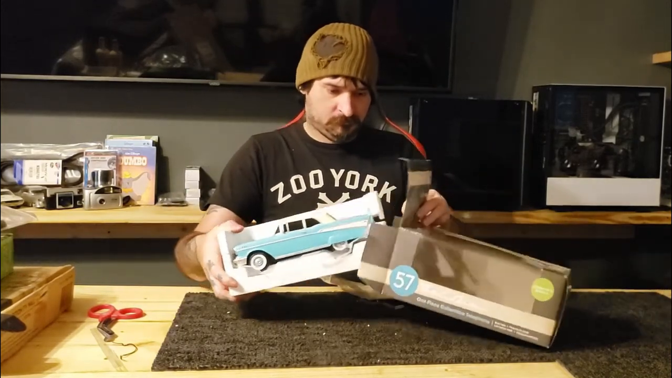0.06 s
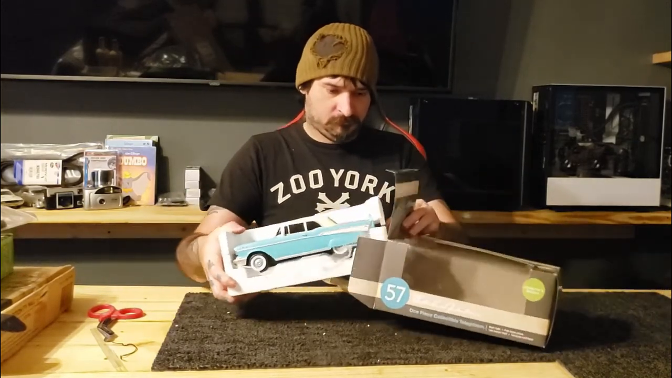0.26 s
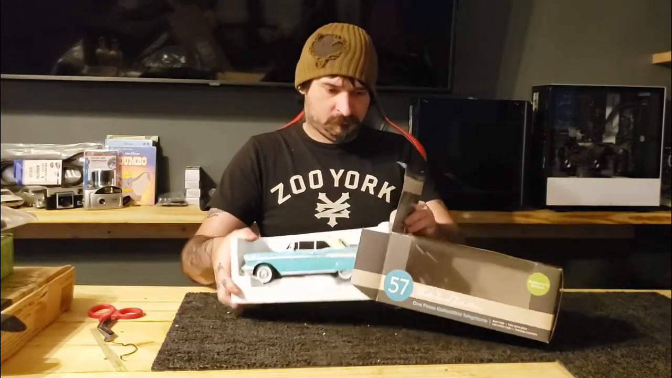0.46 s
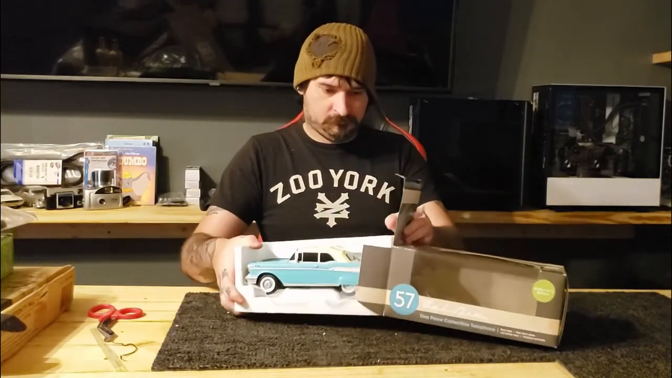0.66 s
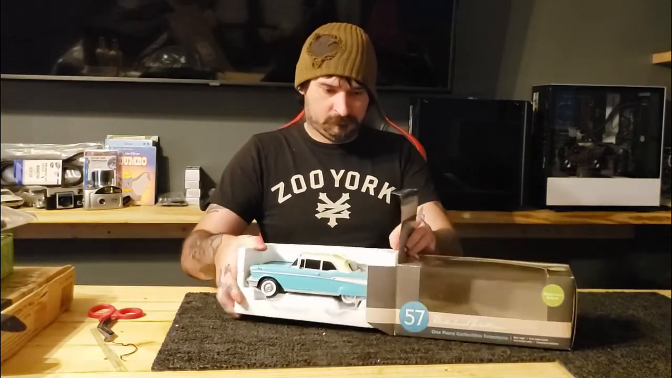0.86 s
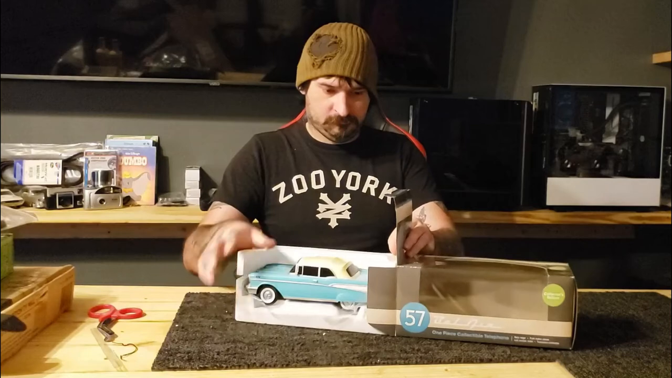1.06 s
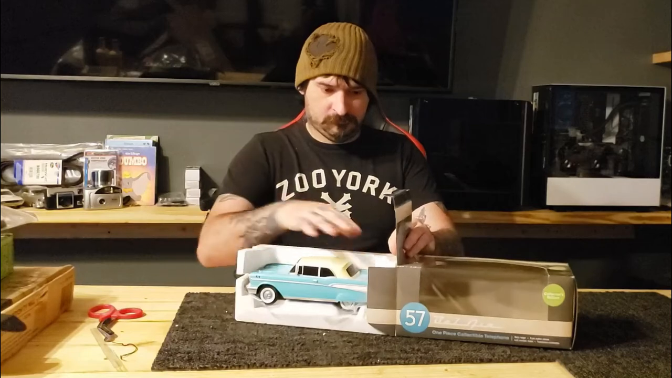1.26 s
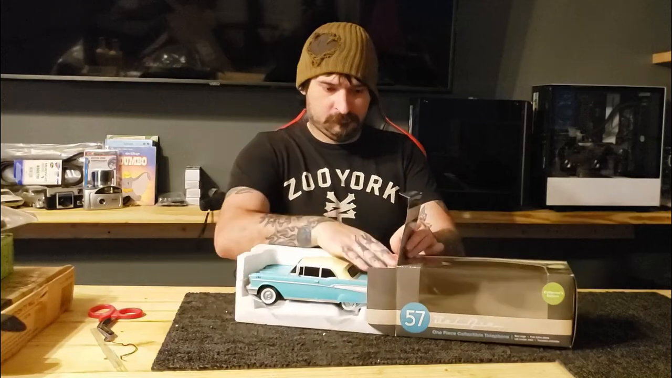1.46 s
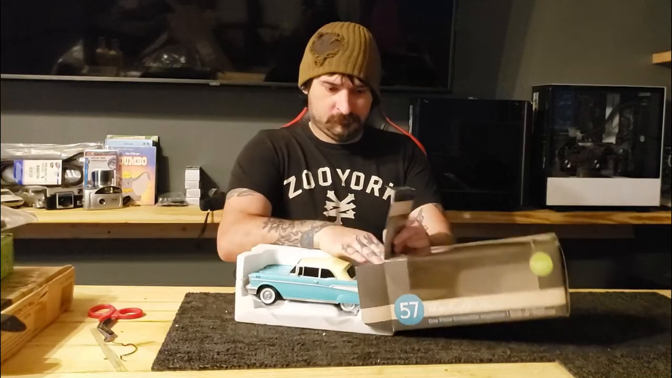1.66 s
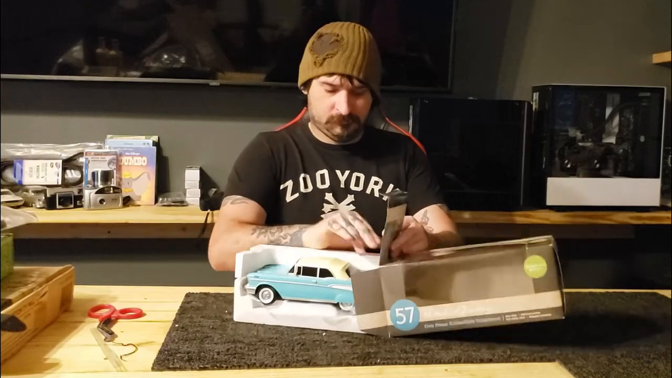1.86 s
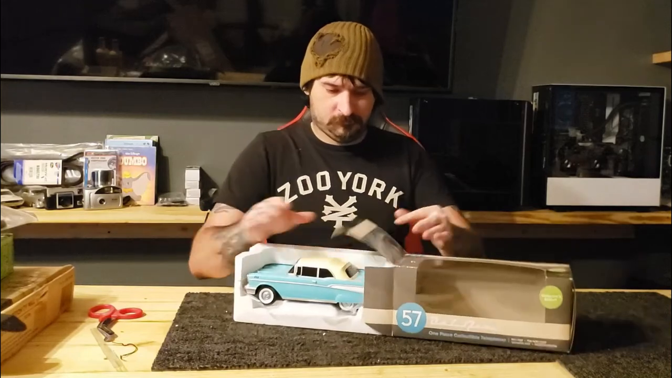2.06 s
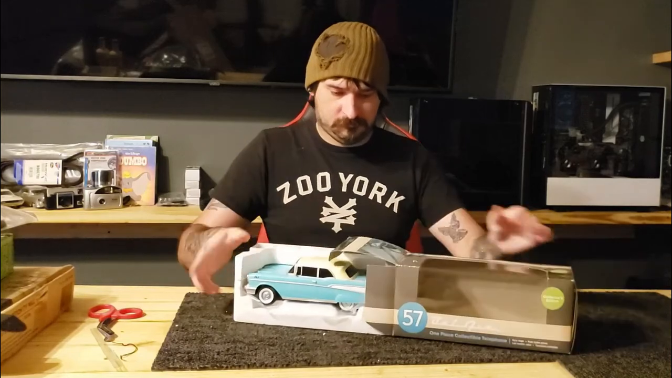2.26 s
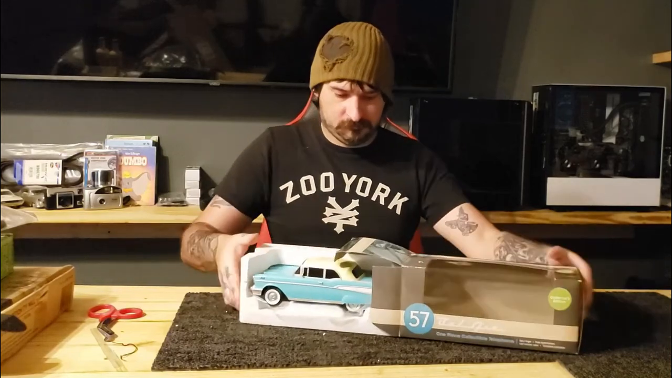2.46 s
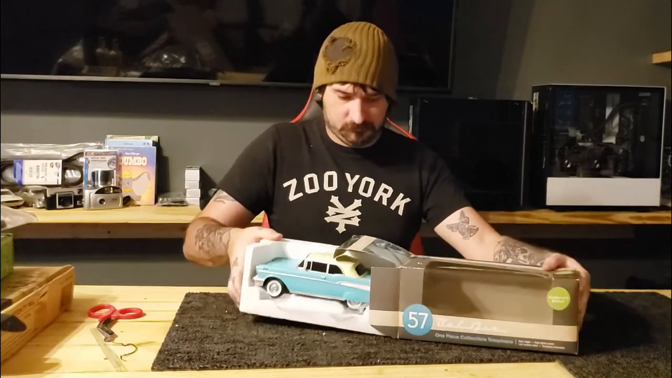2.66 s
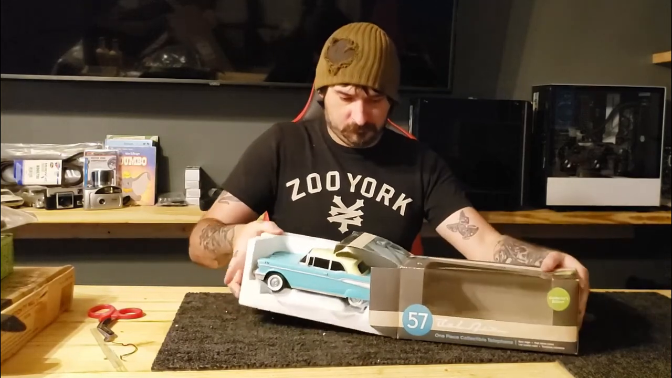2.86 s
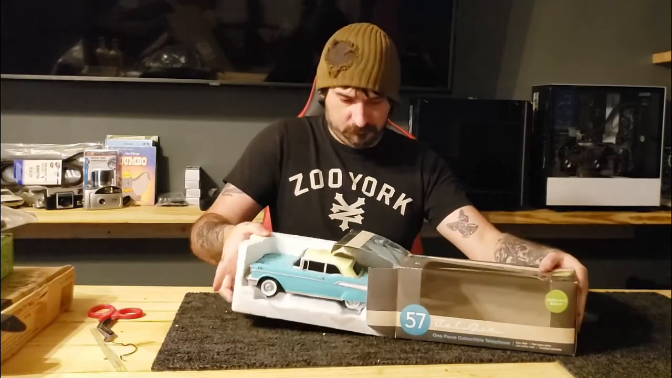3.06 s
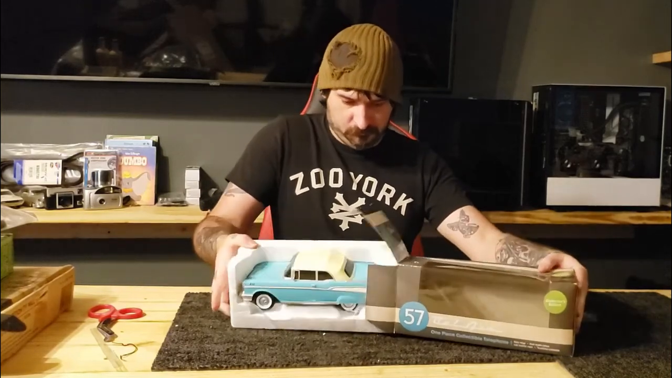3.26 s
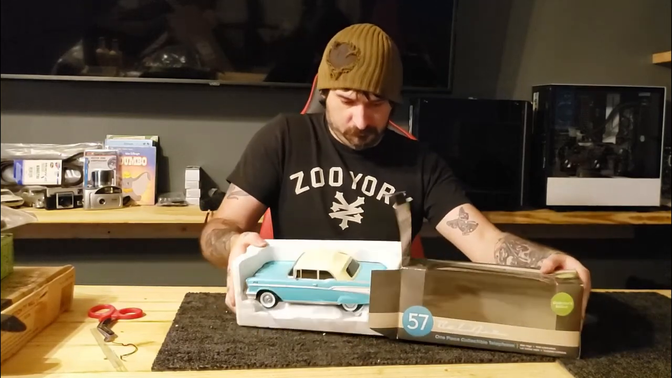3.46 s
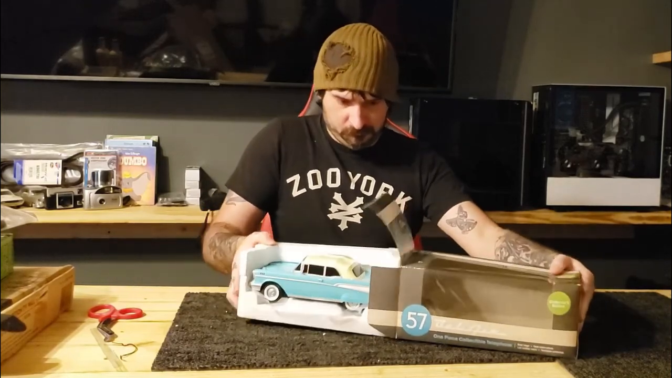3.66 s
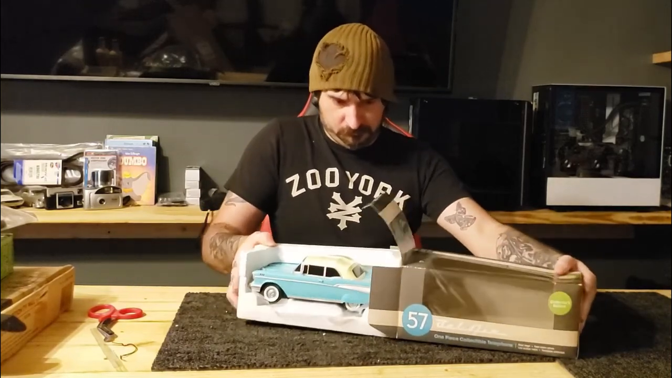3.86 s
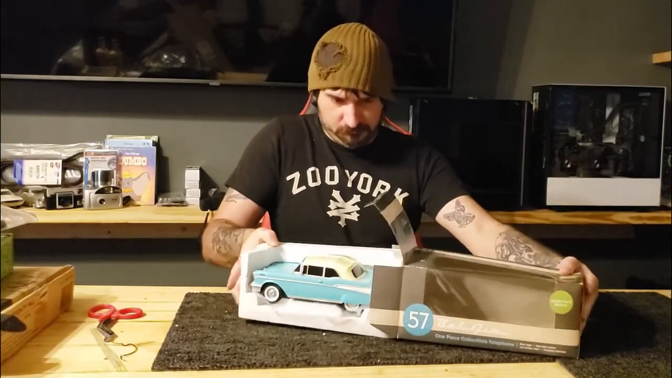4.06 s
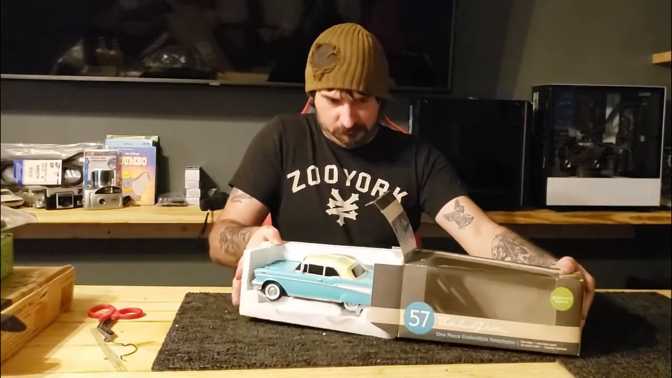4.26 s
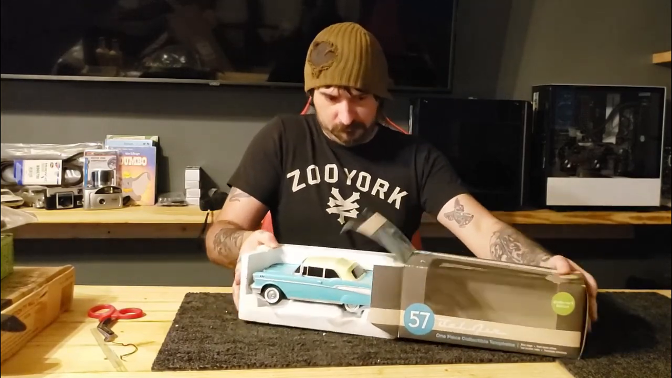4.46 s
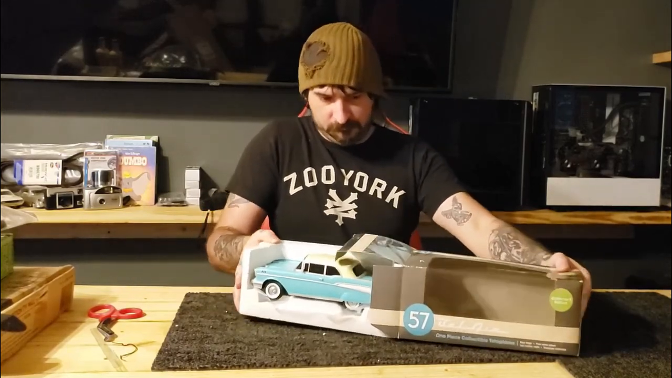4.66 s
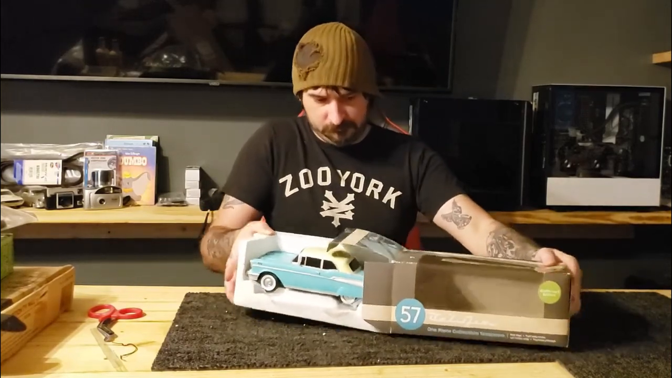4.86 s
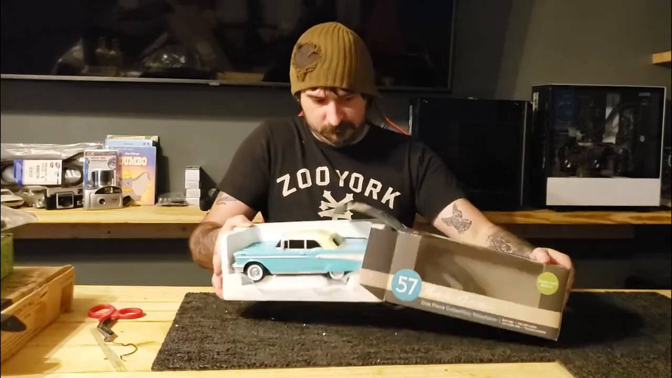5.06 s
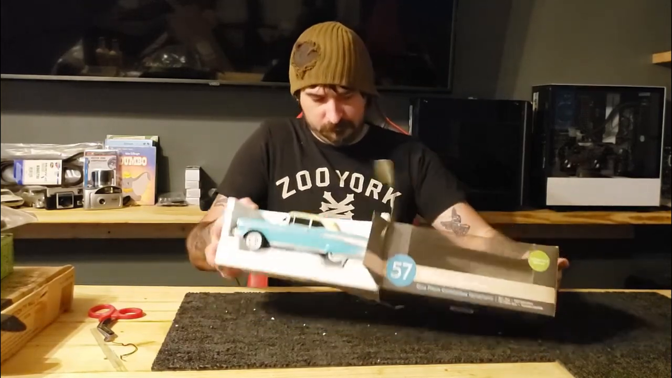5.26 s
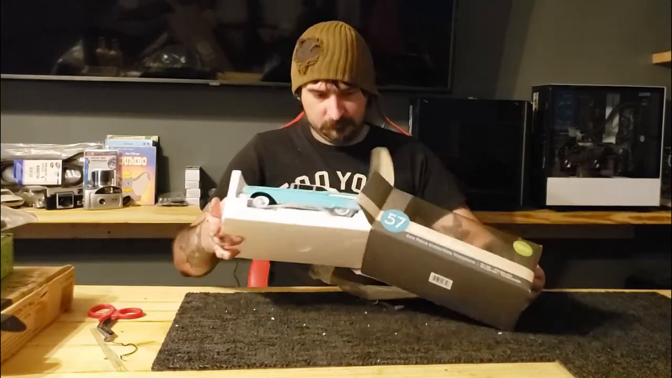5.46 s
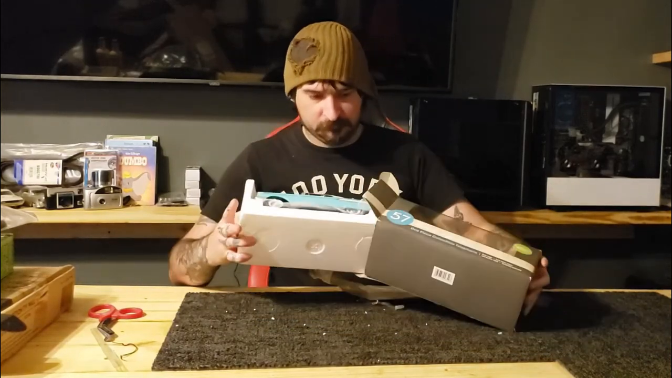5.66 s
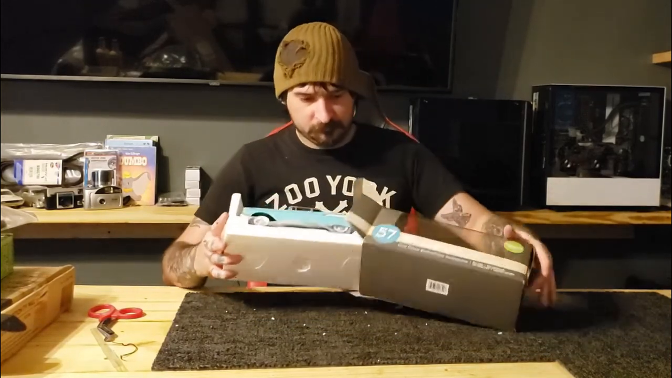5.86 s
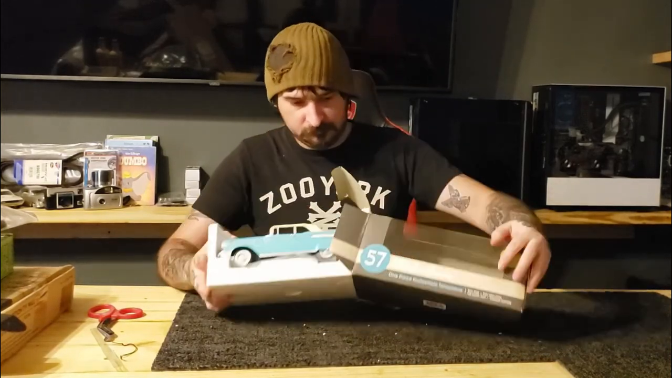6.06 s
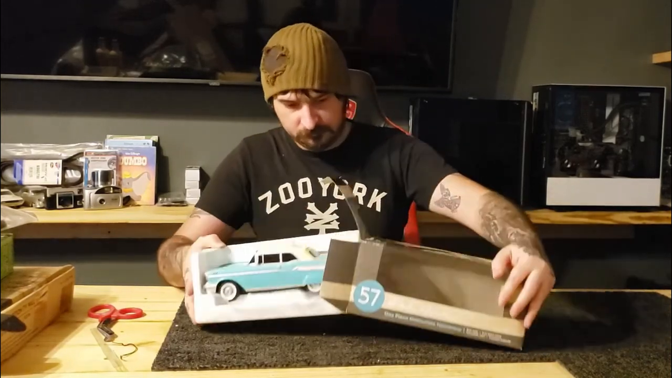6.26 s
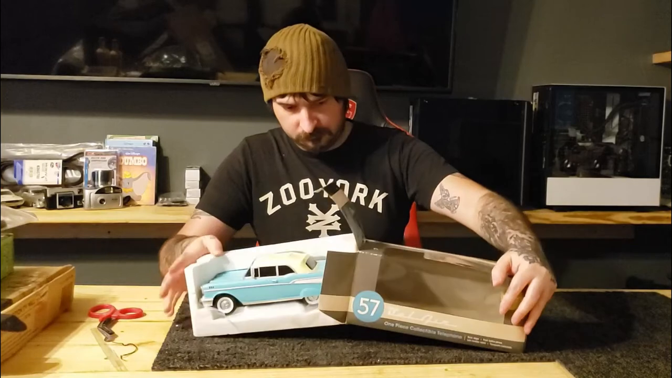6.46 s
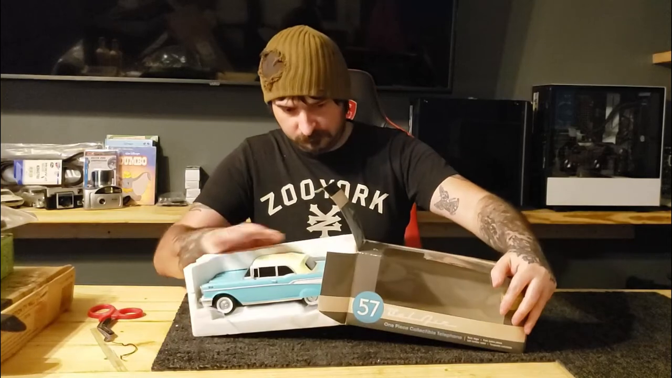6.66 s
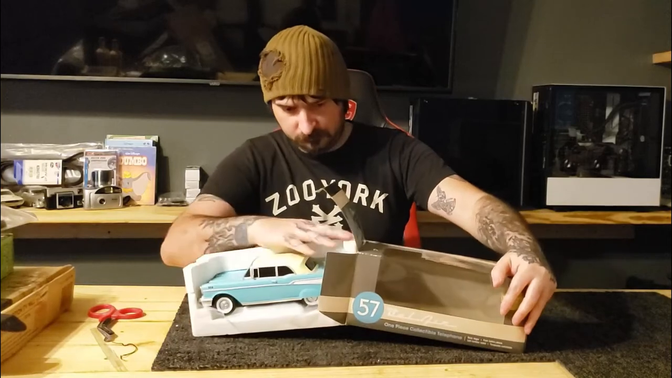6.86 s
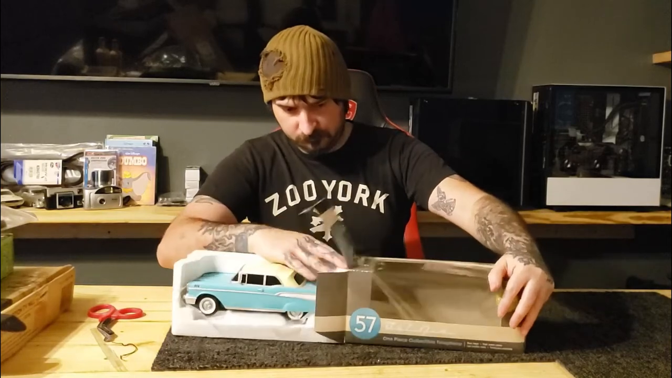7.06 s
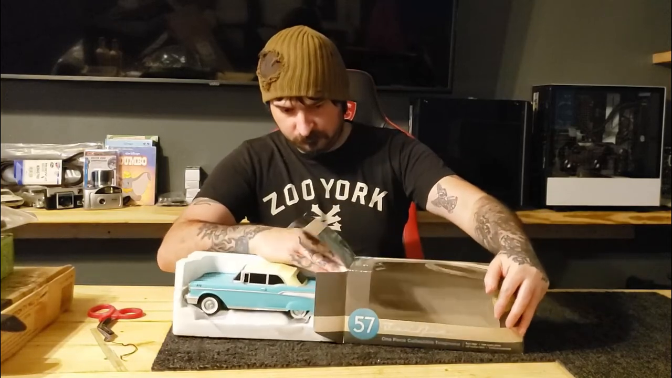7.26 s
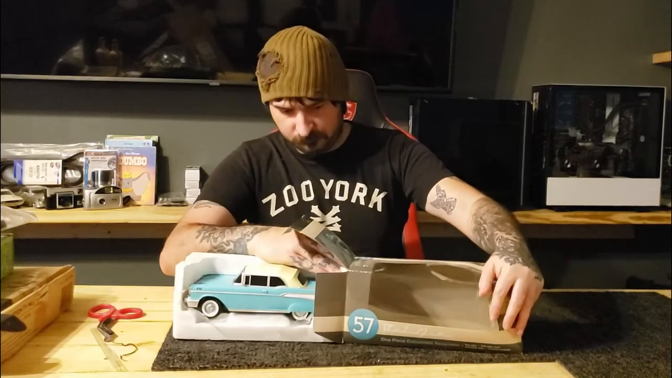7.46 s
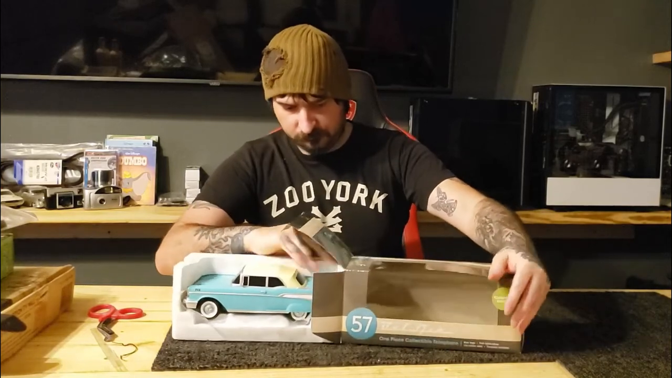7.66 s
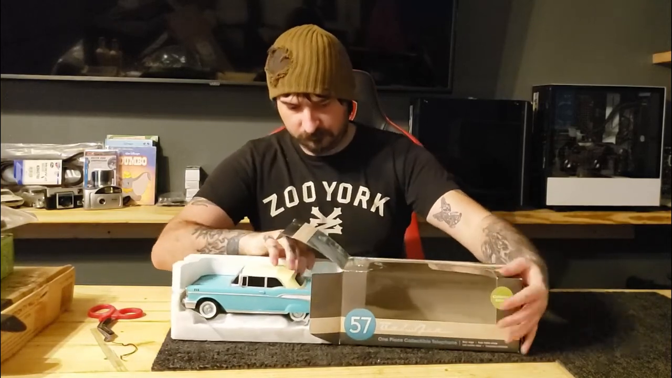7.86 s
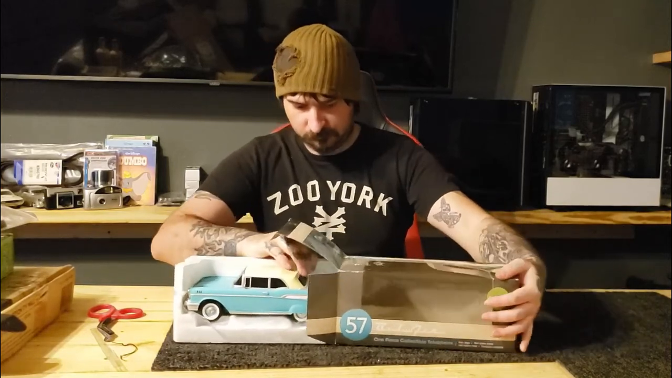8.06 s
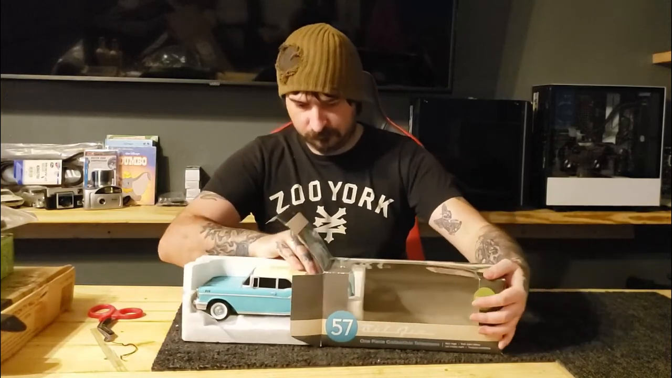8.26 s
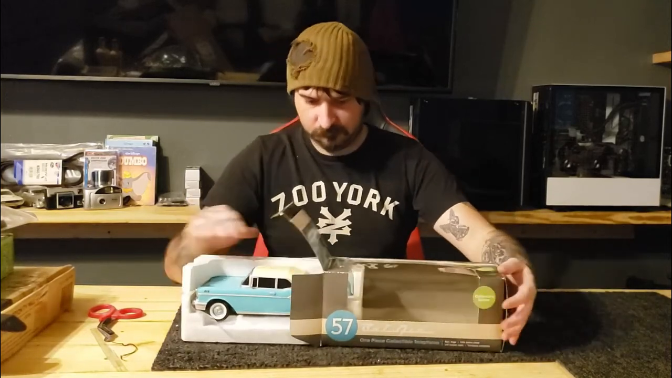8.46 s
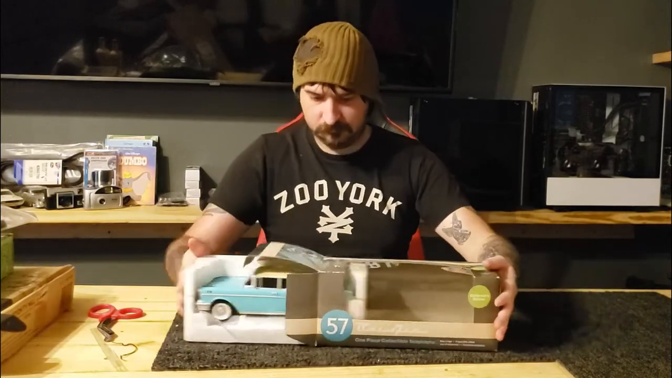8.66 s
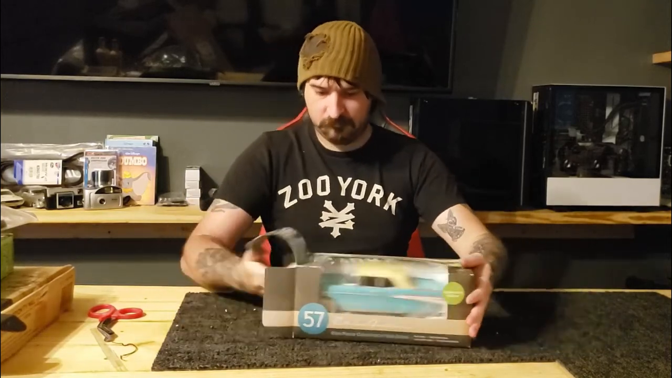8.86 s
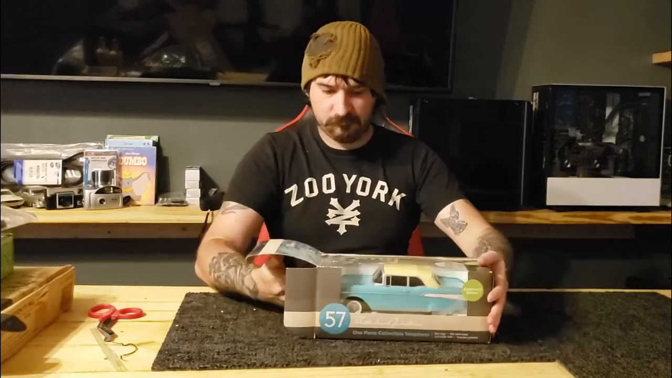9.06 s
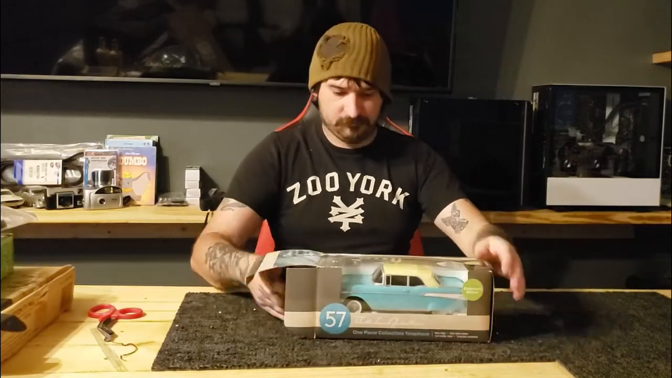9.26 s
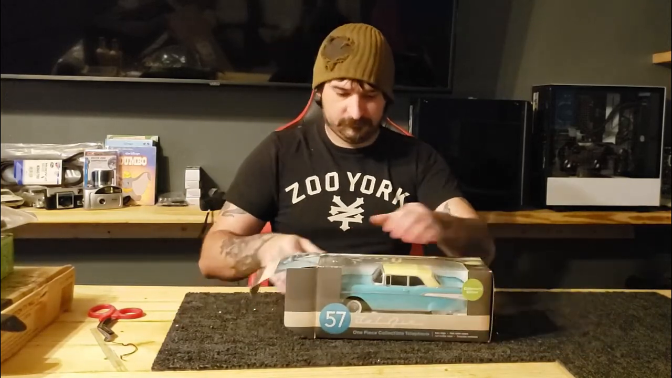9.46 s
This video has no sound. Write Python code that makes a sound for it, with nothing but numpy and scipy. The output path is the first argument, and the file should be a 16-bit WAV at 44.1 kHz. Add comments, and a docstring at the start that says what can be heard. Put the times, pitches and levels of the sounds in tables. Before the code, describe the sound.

Close up in a small, slightly reverberant workshop, cardboard scuffs and bumps as someone fits a foam tray into a box. A cluster of hollow knocks comes early, followed by stop-and-start scraping, a sharp snap and more bumps against the bench. After further rubbing and tiny squeaks, the tray slides in and clatters, the loudest moment. A low mains hum continues underneath.

```python
"""A cardboard box knocks and scrapes as a foam tray holding a model car is worked into it.
Blows and the snapping flap ring the box's modes; its weight thumps the bench through a mat.
Tray and fingers slide in tiny slips that drum on the panels, rasp at the edges and hiss.
Edges catch and scuff, and the tray slides home with a clatter.
A small workshop with a mains hum reverberates; two close microphones pick it up."""
import sys
import numpy as np
from scipy import signal
from scipy.fft import rfft, irfft
from scipy.io import wavfile
from scipy.ndimage import uniform_filter1d

SR = 44100
rng = np.random.default_rng(int(sys.argv[2]) if len(sys.argv) > 2 else 0)


def store_pcm(level_fs):
    """Save levels as 16-bit WAV."""
    pcm = np.round(np.clip(level_fs, -1, 1) * 32767).astype(np.int16)
    wavfile.write(sys.argv[1], SR, np.atleast_2d(pcm).T)


N = 419391
HZ = np.fft.rfftfreq(N, 1 / SR)
TIME_S = np.arange(N) / SR

# Spectrum of the finest slips. Each row: frequency in Hz, relative level in dB.
HISS_SPECTRUM = [(1500, -1.5), (3500, -2), (5500, 1.5), (8000, 0.5), (11000, 5), (13000, 3), (16000, -4.5)]


def knocks(size=8192):
    """Each blow rings the box; a soft contact loses treble, and the struck panel stands out."""
    # Each row: start in seconds, peak before the room in dB, contact time in ms, bass lift in dB,
    # panel pitch in Hz, panel lift in dB.
    blows = [ (.110, -31.5, 0.96, 6, 533, 13), (.153, -22.5, 0.52, -16, 536, 17),
             (.165, -24, 0.83, 8.5, 584, 8), (0.168, -28, 0.76, -6, 1060, 14),
             (.556, -29, 0.99, -2, 550, 2), (.902, -33.5, 0.33, 15, 1310, 6),
             (1.636, -31, 0.94, -19, 407, 0), (1.928, -25, 0.55, -9, 560, 12),
             (1.935, -20.5, 1.03, -4, 383, 7), (2.106, -16, 1.4, 7, 413, 7),
             (2.114, -14.5, 0.43, -1, 570, 10), (2.126, -17, 0.52, -6, 174, 13),
             (2.143, -24, 0.39, -5, 583, 16), (2.226, -21.5, 0.49, 2.5, 1140, 7),
             (2.238, -31.5, 0.13, -10, 4330, 3), (2.575, -25.5, 0.78, 9, 356, 3),
             (2.605, -24.5, 0.92, -9, 555, -5), (2.880, -15, 1.5, -8.5, 410, 3),
             (3.759, -23.5, 0.37, 5, 370, 11), (3.76, -31, 0.34, 5, 1120, 30),
             (3.939, -38, 0.37, -17, 1450, 6), (4.110, -32.5, 0.35, 10, 383, -9),
             (4.156, -29.5, 0.49, 6, 350, -1), (4.519, -27.5, 0.42, 9, 400, 12.5),
             (4.535, -29.5, 0.33, 2, 350, 7), (4.634, -13, 0.095, -6.5, 1590, 5.5),
             (4.896, -33.5, 0.93, -9, 390, -6), (5.234, -20, 0.82, -8, 397, 7),
             (5.239, -21.5, 0.84, -2, 236, 13), (5.246, -15, 0.49, 1, 513, 17.5),
             (5.283, -33, 0.82, 16, 500, -6), (5.490, -31.5, 0.82, 6, 240, 5),
             (5.527, -26, 0.65, 9, 458, 15), (5.939, -26, 0.71, 5, 552, 13.5),
             (6.514, -29.5, 0.8, 15, 200, -0.5), (6.554, -34, 0.78, -1, 523, 12),
             (6.967, -33, 1.55, 10, 330, 5), (7.135, -20, 0.6, 3, 490, 2), (7.144, -20.5, 0.52, 5, 267, 10),
             (7.163, -20.5, 1.57, -5.5, 335, -6), (7.401, -23, 0.73, -3, 344, 19),
             (7.401, -35, 2.2, 0, 180, 23), (7.531, -18, 0.19, 1, 380, 11),
             (7.683, -24.5, 0.66, -2, 340, -4), (7.746, -24.5, 0.35, -5, 564, -2),
             (8.145, -26.5, 0.49, 0, 400, 10), (8.355, -17.5, 0.083, -12, 3730, 7.5),
             (8.680, -24, 1.45, -11.5, 346, -3), (8.923, -17.5, 2.1, -11, 347, 2),
             (8.947, -16.5, 0.55, -2, 483, -3), (8.984, -9, 0.36, -18, 435, 7.5),
             (8.990, -18, 0.41, 6, 348, 10), (9.017, -9, 0.34, -1, 1080, 13),
             (9.023, -16, 0.38, 5.5, 1010, -3), (9.033, -21.5, 0.35, 1, 265, 16.5),
             (9.156, -25, 0.25, -6, 1200, 13)]
    # Each row: frequency in Hz, relative level in dB.
    blow_spectrum = [(30, -17), (80, -2), (150, -6), (300, 1.5), (550, 2), (720, -3), (1500, -1),
                     (2500, -6), (4200, -10), (6000, -13.5), (8000, -14), (16000, -7)]
    hz = np.fft.rfftfreq(size, 1 / SR)
    body_db = read(blow_spectrum, hz) + box_db(hz)
    out = np.zeros((2, N))
    for start_s, peak_db, contact_ms, weight_db, panel_hz, ring_db in blows:
        contact_db = -10 * np.log10(1 + (hz * contact_ms * 1.9e-3) ** 4.6)
        bass_db = weight_db / (1 + (hz / 240) ** 4)
        panel_db = ring_db * resonance(hz, panel_hz, 0.29 * panel_hz)
        blow = bending_pulse(body_db + np.maximum(contact_db, -38) + bass_db + panel_db, size)
        blow *= amp(peak_db) / abs(blow).max()
        room = workshop(wet_db=1.5, build_s=0.0012)
        add(out, start_s, signal.fftconvolve(blow[None], room, axes=1))
    return out


def box_db(hz):
    """Lift that the box's modes give to any excitation."""
    # Each row: centre in Hz, width in Hz, lift in dB.
    modes = [(194.6, 57, 5), (236, 36, 4.5), (349.4, 17, 1), (422, 8.5, 9), (480.3, 8.3, 6), (576, 43, 3),
             (804, 140, 4.5), (999, 9.5, 7.5), (1140, 14, -3.5), (1346, 13, 5), (1653, 33, 3)]
    return sum(db * resonance(hz, centre_hz, width_hz) for centre_hz, width_hz, db in modes)


def bending_pulse(spectrum_db, size, delay_at_500hz_s=0.001798):
    """Minimum-phase pulse, dispersed: bending waves in card carry treble faster than bass."""
    hz = np.fft.rfftfreq(size, 1 / SR)
    cepstrum = irfft(np.log(amp(spectrum_db)))
    cepstrum[1:size // 2] *= 2
    cepstrum[size // 2 + 1:] = 0
    lag_rad = 4 * np.pi * delay_at_500hz_s * np.sqrt(500 * hz)
    fade = signal.windows.hann(2 * size)[size:]
    return irfft(np.exp(rfft(cepstrum) - 1j * lag_rad)) * fade


def tray_pushes():
    """The tray drags along the card: coarse slips drum on the panels, finer ones rasp at the edges."""
    # Each row: start in seconds, length in seconds, swell in dB, panel rub in dB, edge scrape in dB.
    pushes = [(0, 0.37, 14, -56, -69), (0.45, 0.37, -3.5, -49.5, -56), (0.865, 0.19, 3.5, -46.5, -52),
              (1.517, 0.38, 10, -47, -52.5), (2.472, 0.2, 9, -42.5, -59.5), (2.693, .13, 1.5, -46, -46.5),
              (2.88, .2, -6, -48, -56), (3.112, 0.3, 6.5, -42.5, -43.5), (3.374, 0.17, 2, -41.5, -49),
              (3.526, 0.25, 13, -53, -53), (3.94, 0.25, 14, -48.5, -61), (4.27, 0.056, 2, -52, -63),
              (4.438, 0.14, 17, -50, -55), (4.84, 1, -3.5, -47, -52.5), (5.423, 0.18, 10.5, -51.5, -46.5),
              (5.648, 0.032, -1, -48, -71), (5.915, 0.12, -1, -46, -49), (6.19, 0.097, -10, -50, -56.5),
              (6.404, 0.14, 8, -51.5, -58.5), (6.61, 0.395, 15, -63, -61.5),
              (7.069, 0.093, 6, -44.5, -45.5), (7.309, 0.2, -13, -47, -46), (7.68, 0.11, -9, -40, -58.5),
              (7.973, 0.12, 7, -46.5, -49.5), (8.18, .15, -1.5, -42, -45.5), (8.466, 0.059, 3.5, -47, -53),
              (8.705, 0.21, 7.5, -34, -43.5), (8.929, 0.044, 6, -36, -32.5), (9.145, 0.11, -10, -48, -56),
              (9.396, 0.063, -6, -62, -71)]
    # Each row of both spectra: frequency in Hz, relative level in dB.
    rub_spectrum = [(30, -32), (80, -3), (130, -10), (220, -4.5), (350, 1), (550, -1), (720, -8.5),
                    (1200, -14), (2000, -27.5), (5000, -70)]
    scrape_spectrum = [(300, -41), (800, -2.5), (1500, -1), (2200, -7), (3200, -12), (4500, -18),
                       (7000, -23.5), (16000, -64)]
    shape = dict(rise_s=0.017, arch_db=1.8, fall_db_per_s=169)
    panel_gain = strokes([(*push, db) for *push, db, _ in pushes], **shape, rest_db=-58)
    edge_gain = strokes([(*push, db) for *push, _, db in pushes], **shape, rest_db=-74)
    rub = friction(read(rub_spectrum, HZ) + box_db(HZ), slips_per_s=220, spread_db=2.5,
                   grit=0.68, judder_db=1.0, judder_s=0.011, ripple_db=7)
    scrape = friction(read(scrape_spectrum, HZ) + 0.46 * box_db(HZ), slips_per_s=400, spread_db=6.0,
                      grit=0.75, judder_db=0.74, judder_s=0.031, ripple_db=6.5)
    return panel_gain * rub + edge_gain * scrape


def hand_glides():
    """Fingers and foam hiss across the smooth face of the box; a palm brushes the foam."""
    # Each row of both: start in seconds, length in seconds, swell in dB, level in dB.
    glides = [(0, .17, 8, -56), (.25, 0.078, 2.5, -55), (.44, 0.15, -7, -52), (.6, 0.33, -6, -66),
              (.89, 0.17, 7, -52), (1.1, 0.058, 4.5, -50.5), (1.5, 0.065, 8.5, -52.5),
              (1.68, 0.25, 15, -53), (2.06, 0.072, 2, -54), (2.48, 0.15, -1, -59.5), (2.71, 0.32, -13, -58),
              (3.08, 0.11, 9, -59.5), (3.26, 0.3, -5, -52), (3.58, 0.19, 8.5, -51), (4.11, .12, 1, -56.5),
              (4.525, 0.19, -1, -55.5), (4.87, 0.1, 1, -57.5), (5.04, .21, 8.5, -47),
              (5.44, 0.25, -16, -51.5), (5.945, 0.081, -7.5, -45.5), (6.18, 0.092, 3, -66),
              (6.39, 0.13, 12, -54.5), (6.6, 0.44, -6.5, -56), (7.07, 0.083, 18, -45), (7.3, 0.057, 6, -55),
              (7.525, .02, -11, -54), (7.755, 0.046, -5, -47), (7.98, 0.096, 7, -52.5),
              (8.18, .15, 5.5, -47), (8.75, 0.22, 3.5, -43)]
    brushes = [(6.6, 0.35, -1, -49.5), (8.75, 0.18, 12, -48)]
    # Each row: frequency in Hz, relative level in dB.
    palm_spectrum = [(3000, -36), (8300, -17), (9400, 2), (12000, 2), (16000, -3)]
    shape = dict(rise_s=0.011, arch_db=1.2, fall_db_per_s=154)
    hiss = friction(read(HISS_SPECTRUM, HZ), slips_per_s=760, spread_db=2.0,
                    grit=1.0, judder_db=1.0, judder_s=0.024, ripple_db=5.5)
    palm = friction(read(palm_spectrum, HZ), slips_per_s=3300, spread_db=11,
                    grit=0.4, judder_db=1.0, judder_s=0.015, ripple_db=3)
    return strokes(glides, **shape, rest_db=-74) * hiss + strokes(brushes, **shape) * palm


def strokes(rows, rise_s, arch_db, fall_db_per_s, rest_db=-120):
    """Gain of hand strokes: each eases in, swells or slackens, then falls to the resting contact."""
    t = TIME_S[::SR // 1000]
    power = amp(rest_db) ** 2
    for start_s, length_s, swell_db, level_db in rows:
        progress = np.clip((t - start_s) / length_s, 0, 1)
        pressure_db = swell_db * (progress - 0.5) + arch_db * (np.sin(np.pi * progress) - 2 / np.pi)
        ease_in = 0.5 + 0.5 * np.tanh(0.5 * (t - start_s) / rise_s)
        fall_db = fall_db_per_s * np.maximum(t - start_s - length_s, 0)
        power += (ease_in * amp(level_db + pressure_db - fall_db)) ** 2
    return np.interp(TIME_S, t, np.sqrt(power))


def friction(spectrum_db, slips_per_s, spread_db, grit, judder_db, judder_s, ripple_db):
    """Tiny uneven slips over a smooth rub, juddering as the surfaces catch; rms 1."""
    sizes = amp(spread_db * np.minimum(rng.exponential(1, N), 4)) * rng.choice([-1, 1], N)
    slips = sizes * (rng.random(N) < slips_per_s / SR)
    slips = signal.oaconvolve(slips[None], workshop(wet_db=1, build_s=0.0028), axes=1)[:, :N]
    rub = unit(roaming_contact(mic_pair(rng.standard_normal((2, N))), ripple_db))
    catch = unit(irfft(rfft(rng.standard_normal(N)) / (1 + (HZ * judder_s) ** 2), N))
    stroke = (rub + grit * unit(slips)) * amp(judder_db * catch)
    return unit(colour(stroke, spectrum_db))


def roaming_contact(x, ripple_db, size=1024):
    """A travelling contact wakes one set of small panel resonances after another."""
    hz, _, frames = signal.stft(x, SR, nperseg=size)
    patches = uniform_filter1d(rng.standard_normal(frames.shape[1:]), size=18, axis=1)
    patches = unit(uniform_filter1d(patches, size=2, axis=0))
    lift_db = ripple_db * patches * (hz / (hz + 400))[:, None]
    return signal.istft(frames * amp(lift_db), SR, nperseg=size)[1][:, :N]


def scuffs(size=8192, tail_db=-13, tail_s=0.067):
    """An edge catches and lets go in a burst of fine slips; the room holds it a little longer."""
    # Each row: start in seconds, level in dB, decay in seconds, squeak pitch in Hz, squeak lift in dB.
    catches = [(0.467, -45, 0.02, 5400, 11), (1.016, -49, 0.013, 11000, 2), (2.702, -51.5, 0.028, 7000, 4),
               (2.880, -48.5, .008, 10830, 0), (4.511, -52.5, 0.038, 10560, 2),
               (4.841, -60.5, 0.019, 11100, 2), (5.453, -50, 0.019, 10900, 19),
               (5.934, -46.5, 0.018, 7140, 13), (7.146, -34.5, 0.0073, 6900, 10),
               (2.054, -58, .04, 7200, 17), (2.226, -60, .012, 9400, 9), (7.309, -49, .006, 11100, -2),
               (7.521, -43.5, 0.0023, 14200, -1), (7.748, -47, 0.0074, 11100, 14),
               (7.97, -51, 0.0096, 11300, 5), (8.681, -62, 0.025, 10500, 2),
               (8.946, -48, 0.0033, 11000, -7)]
    hz = np.fft.rfftfreq(size, 1 / SR)
    t = np.arange(size) / SR
    out = np.zeros((2, N))
    for start_s, level_db, decay_s, squeak_hz, squeak_db in catches:
        spectrum_db = read(HISS_SPECTRUM, hz) + squeak_db * resonance(hz, squeak_hz, width_hz=900)
        burst = unit(irfft(rfft(rng.standard_normal((2, size))) * amp(spectrum_db)))
        envelope = np.exp(-t / decay_s) + amp(tail_db) * np.exp(-t / tail_s)
        add(out, start_s, amp(level_db) * burst * envelope)
    return out


def bench_thumps(t60_s=0.31, rise_s=0.008):
    """The bench top swings as the box's weight lands, cushioned by the mat."""
    # Each row: start in seconds, peak in dB, bench mode in Hz.
    landings = [(.55, -38, 82.3), (2.115, -35, 83.3), (5.25, -41, 45.6), (5.492, -37, 85.5),
                (6.53, -42, 42.8), (7.149, -31, 44)]
    t = np.arange(SR // 2) / SR
    envelope = amp(-60 * t / t60_s) * (1 - np.exp(-t / rise_s))
    out = np.zeros((2, N))
    for start_s, peak_db, mode_hz in landings:
        swing = np.sin(2 * np.pi * mode_hz * t) * envelope
        add(out, start_s, amp(peak_db) * swing[None] / abs(swing).max())
    return out


def workshop(wet_db, build_s, shade_hz=2200, size=22016):
    """Response from one spot on the bench: direct sound, near echoes, diffuse tail."""
    # Each row: frequency in Hz, T60 in seconds.
    reverb_times = [(60, 0.085), (250, 0.37), (600, 0.35), (2000, 0.34), (5000, 0.37), (15000, 0.12)]
    # Near surfaces. Each row: delay in seconds, gain.
    echoes = [(.0057, 0.46), (0.012, 0.64), (0.0207, 0.16)]
    t = np.arange(size) / SR
    hz, frame_s, frames = signal.stft(rng.standard_normal((2, size)), SR, nperseg=256)
    decay = amp(-60 * frame_s / read(reverb_times, hz)[:, None])
    tail = signal.istft(frames * decay, SR, nperseg=256)[1][:, :size]
    tail = mic_pair(tail * (1 - np.exp(-t / build_s)))
    response = amp(wet_db) * tail / np.linalg.norm(tail[0])
    # The box shades the treble of the direct path, which reaches the left microphone first.
    direct = np.exp(-2 * np.pi * shade_hz * t)
    response += np.array([direct, np.roll(direct, 4)]) / direct.sum()
    for delay_s, gain in echoes:
        delay_samples = delay_s * SR * rng.uniform(0.96, 1.04) + rng.uniform(-6, 6, 2)
        response[[0, 1], delay_samples.astype(int)] += gain
    return response


def mains_hum(waver=0.054):
    """Mains harmonics, each wavering slightly in level."""
    # Each row: frequency in Hz, rms level in dB.
    harmonics = [(60, -47.5), (120, -64.5), (180, -70.5), (240, -56.5), (300, -60), (360, -68), (540, -67)]
    hum = np.zeros(N)
    for hz, level_db in harmonics:
        drift = unit(irfft(rfft(rng.standard_normal(N)) * np.exp(-HZ / 2), N))
        tone = np.sqrt(2) * np.sin(2 * np.pi * (hz * TIME_S + rng.random()))
        hum += amp(level_db) * (1 + waver * drift) * tone
    return hum


def room_air(level_db=-52):
    """Steady low rush of the room."""
    # Each row: frequency in Hz, relative level in dB.
    air_spectrum = [(20, -38), (35, -29), (50, 16), (75, 4.5), (130, 3.5), (250, -2), (450, -2), (700, -10),
                    (1500, -46), (3000, -48), (8000, -62), (11000, -55), (16000, -25)]
    noise = mic_pair(rng.standard_normal((2, N)))
    return amp(level_db) * unit(colour(noise, read(air_spectrum, HZ)))


def mic_pair(noises):
    """Makes two unrelated signals alike in the bass, as at two close microphones."""
    # Each row: frequency in Hz, left-right correlation.
    correlations = [(60, 0.96), (130, 0.98), (290, 0.71), (640, 0.57), (1400, 0.18), (3000, 0.017),
                    (6000, 0.04)]
    left, other = rfft(noises)
    alike = read(correlations, np.linspace(0, SR / 2, len(left)))
    right = alike * left + np.sqrt(1 - alike ** 2) * other
    return irfft(np.array([left, right]), noises.shape[1])


def amp(db):
    """Decibels to gain."""
    return 10 ** (np.asarray(db) / 20)


def unit(x):
    """Scales to rms 1."""
    return x / np.sqrt(np.mean(x ** 2) + 1e-20)


def read(points, hz):
    """Interpolates a table on a log-frequency axis."""
    points_hz, values = np.transpose(points)
    return np.interp(np.log(hz + 1), np.log(points_hz + 1), values)


def colour(x, db):
    """Filters a whole signal by a dB value per frequency."""
    return irfft(rfft(x) * amp(db), N)


def resonance(hz, centre_hz, width_hz):
    """Shape of one resonance, 1 at its centre."""
    return 1 / (1 + (2 * (hz - centre_hz) / width_hz) ** 2)


def add(mix, start_s, sound):
    """Mixes a sound in at start_s."""
    part = mix[:, round(start_s * SR):][:, :sound.shape[1]]
    part += sound[:, :part.shape[1]]


def scene():
    """Sliding, scuffs and knocks over the hum."""
    background = mains_hum() + room_air()
    return background + tray_pushes() + hand_glides() + scuffs() + knocks() + bench_thumps()


def record(dry, bass_lag_rad=0.2, cutoff_hz=15900):
    """The right microphone is shaded in the treble and lags in the bass; both are low-passed."""
    # Each row: frequency in Hz, gain in dB.
    right_response = [(60, 0.54), (700, 0.07), (1300, 0.5), (2600, 2.5), (4400, -4.5), (6300, -13.5),
                      (8300, -24.5), (11000, -14), (15000, -3)]
    lag_rad = bass_lag_rad / (1 + (HZ / 220) ** 2)
    right = irfft(rfft(dry[1]) * amp(read(right_response, HZ)) * np.exp(-1j * lag_rad), N)
    lowpass = signal.firwin(511, cutoff_hz, window=("kaiser", 9), fs=SR)
    return signal.oaconvolve(np.array([dry[0], right]), lowpass[None], "same")


dry = scene()
out = record(dry)
store_pcm(out)
```